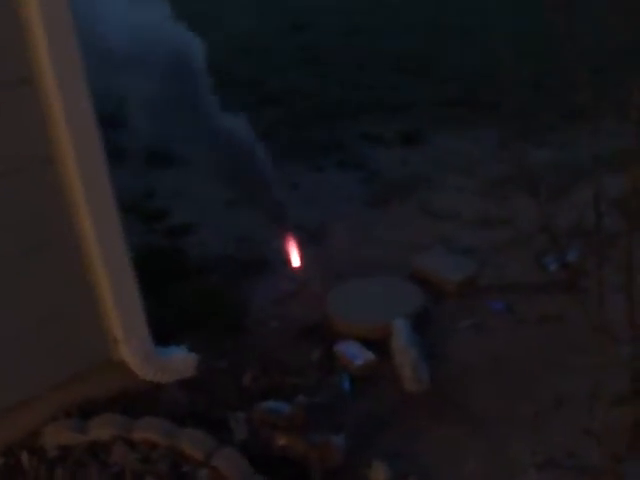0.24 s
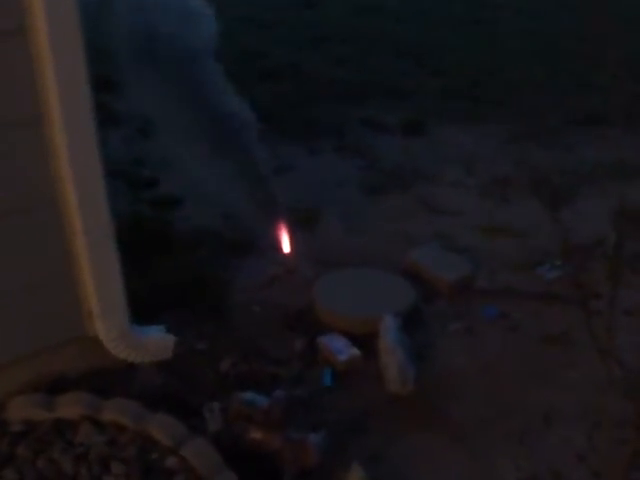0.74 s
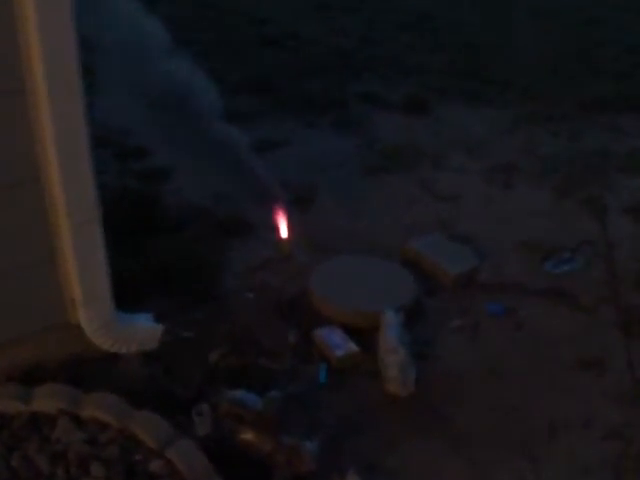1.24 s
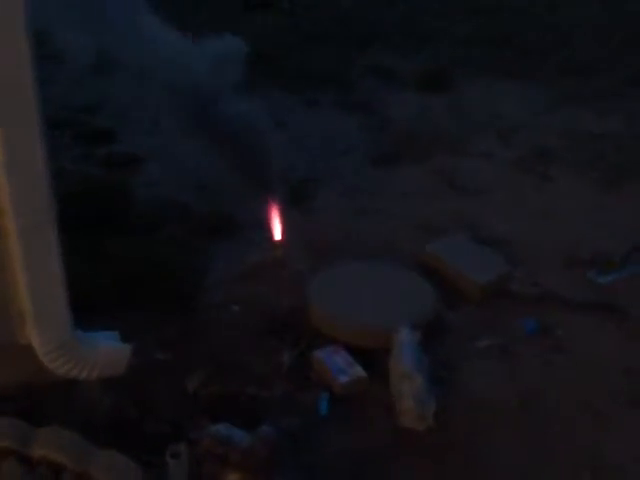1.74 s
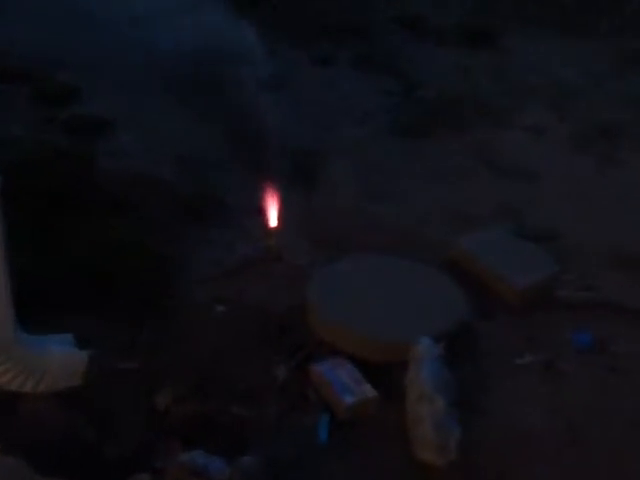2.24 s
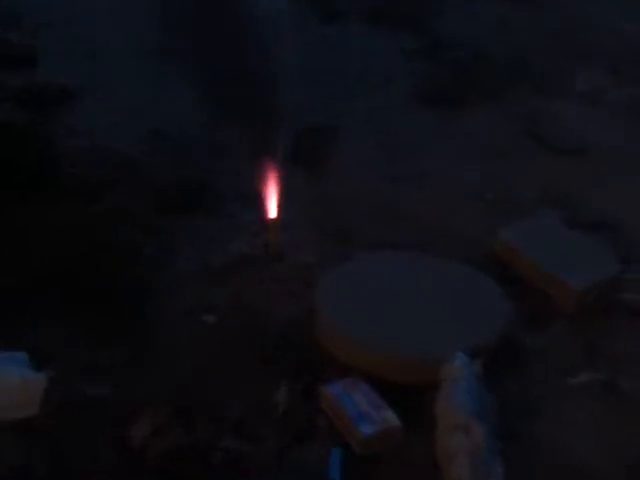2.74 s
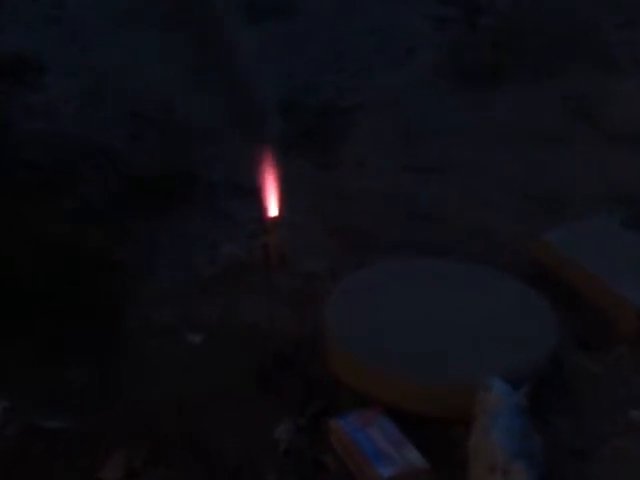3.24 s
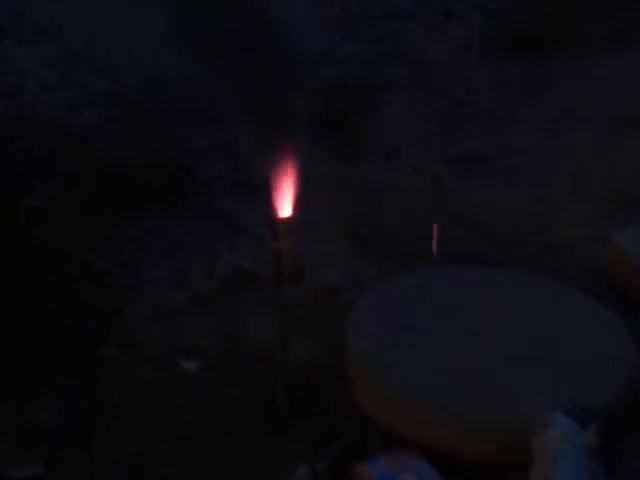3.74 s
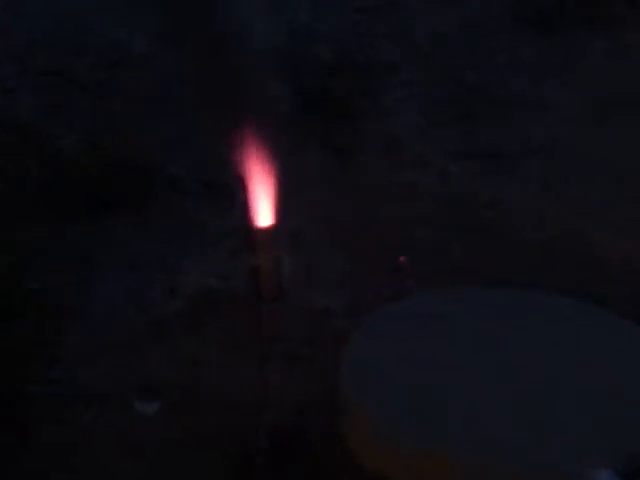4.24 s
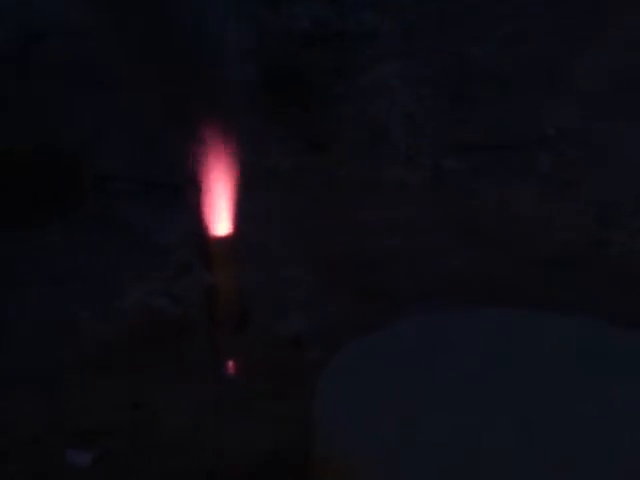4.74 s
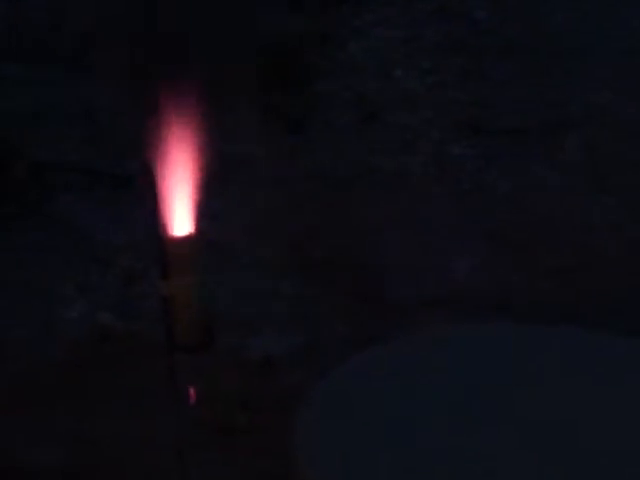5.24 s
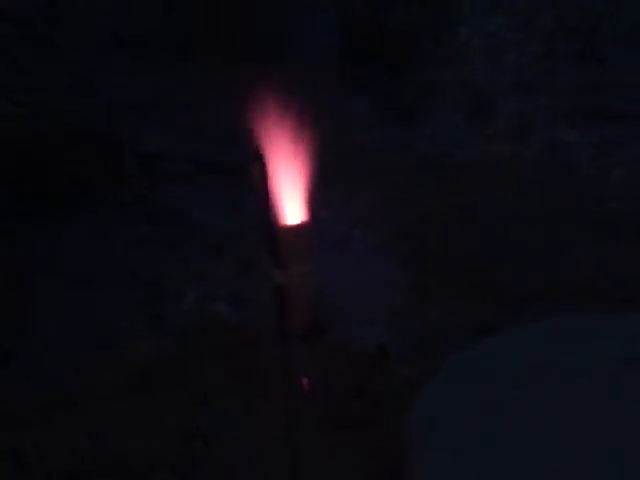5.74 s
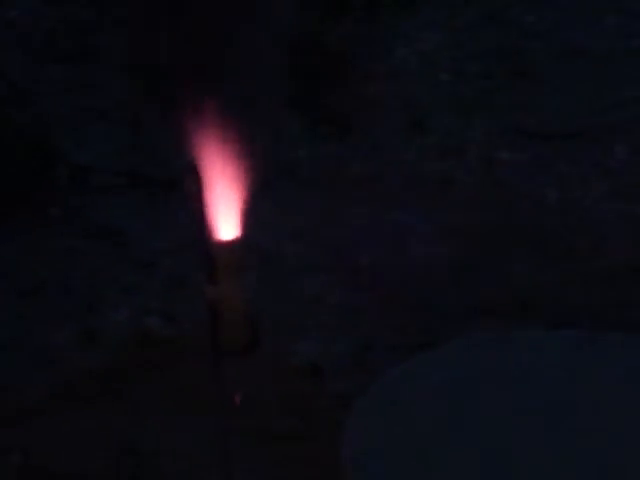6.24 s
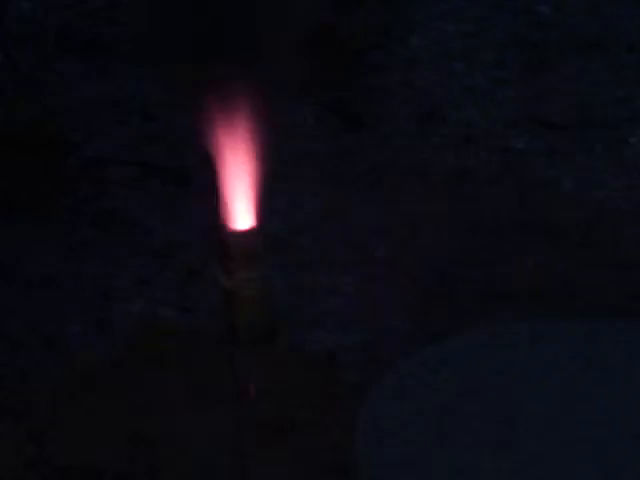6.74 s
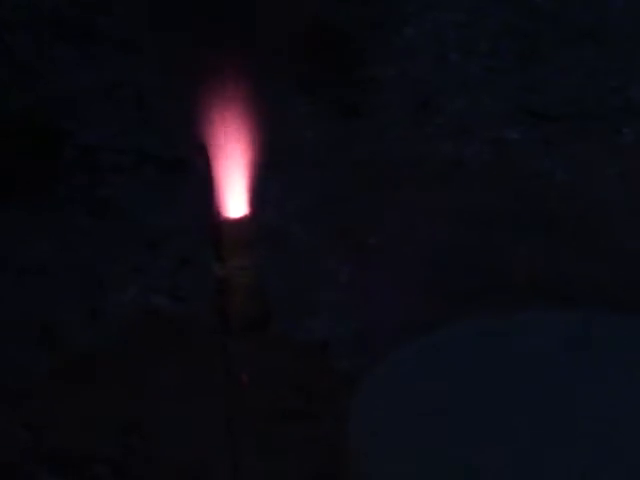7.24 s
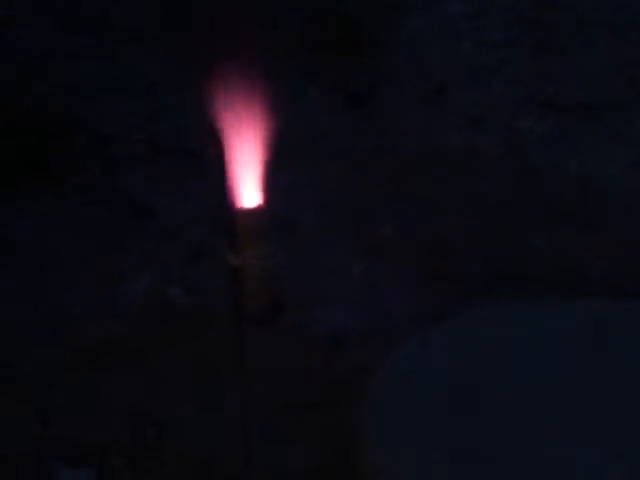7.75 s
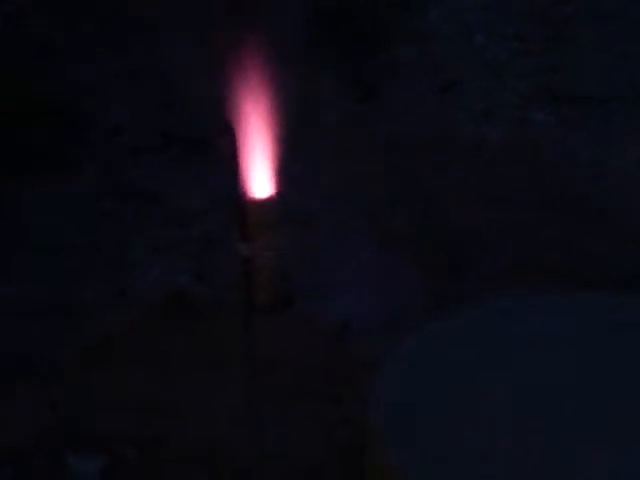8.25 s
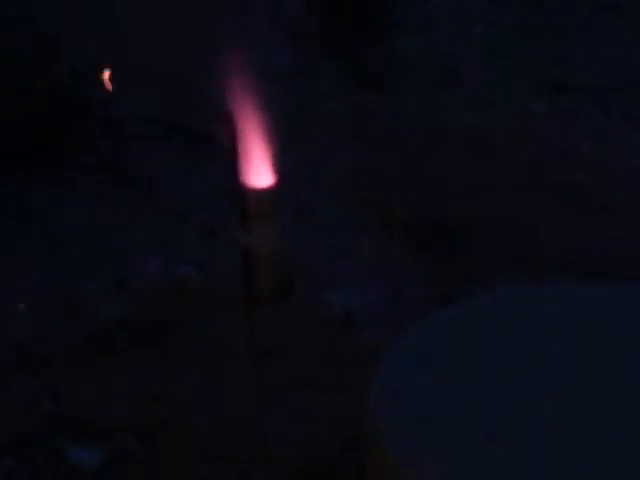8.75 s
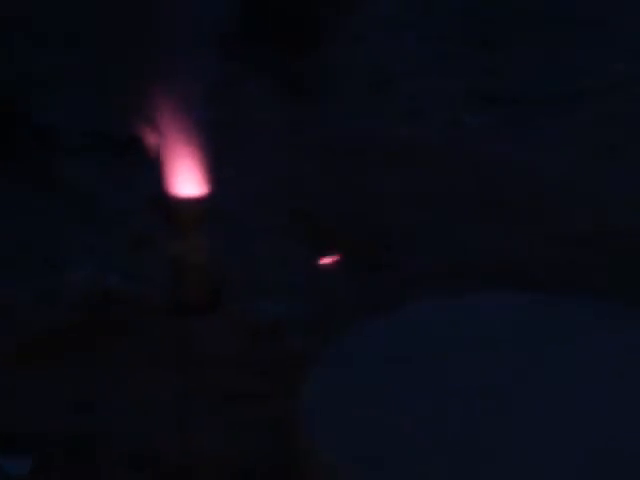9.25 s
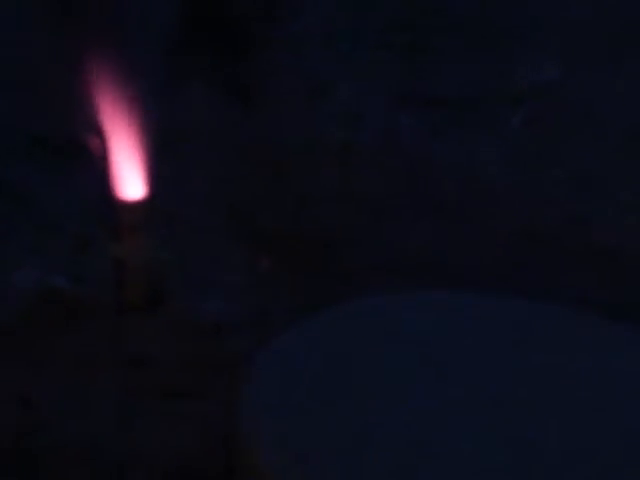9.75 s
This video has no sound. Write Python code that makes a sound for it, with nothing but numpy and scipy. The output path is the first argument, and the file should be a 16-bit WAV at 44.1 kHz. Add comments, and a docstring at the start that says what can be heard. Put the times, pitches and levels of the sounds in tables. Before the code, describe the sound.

Already burning at the start, a jet of exhaust rushes without pause, like gas escaping a narrow pipe. The noisy whistle-like band sinks to about half its pitch as the fuel goes. A soft roar and faint rumble sit underneath; a quick puff interrupts midway, a softer one follows, and a rougher flare comes late. Near, dry outdoor sound, with faint ground and wall echoes and limited extreme treble.

```python
"""A small homemade rocket motor burns upright in a yard, near a hand-held camera.
Its jet hisses, and drives the hollow casing to sing in a broad band that sinks as the fuel burns down.
The plume above roars and rumbles in coloured noise, swelling with a late flare; three brief puffs of
lower-pitched noise are slag sputtering in the mouth. A faint low drone lies beneath.
Echoes from the ground and a house wall, a scattered tail and the microphone port colour the motor."""
import sys
import numpy as np
from scipy import signal
from scipy.fft import rfft, irfft
from scipy.io import wavfile
from scipy.ndimage import map_coordinates

SR = 44100
rng = np.random.default_rng(int(sys.argv[2]) if len(sys.argv) > 2 else 0)


def unload_audio(sound):
    """Save the sound as a 16-bit wav file, at the path given as the first command line argument."""
    columns = np.transpose(np.atleast_2d(sound))
    # keep every value between -1 and 1, then stretch to whole-number steps
    steps = np.round(np.clip(columns, -1, 1) * 32767)
    wavfile.write(sys.argv[1], SR, steps.astype(np.int16))


N = 441000
FRAME = 4096  # samples
HZ, TIMES, _ = signal.stft(np.zeros(N), SR, nperseg=FRAME)
HZ = HZ[:, None] + 1  # keeps clear of 0 Hz

# The fuel burns briefly faster or slower. Each row: centre in seconds, change in dB, 1/e half-length in seconds.
BURN_SURGES = [(1.78, 1.2, .12), (3.68, .7, .2), (4.02, -.9, .06), (4.22, .9, .12), (5.22, 2.2, 0.075),
               (5.34, -1.1, .05), (5.55, .8, .08), (6.35, -1.2, .06), (7.02, 1.3, 0.063), (8.03, -.7, .12)]


def amp(db):
    """Decibels to gain."""
    return 10 ** (np.asarray(db) / 20)


def curves(rows, times):
    """Each column of a table after the first (seconds), interpolated at the given times."""
    s, *cols = np.transpose(rows)
    return [np.interp(times, s, c) for c in cols]


def bumps(rows, t):
    """Level change in dB from (s, dB, length) events, each a smooth Gaussian bump or dip."""
    return sum(db * np.exp(-((t - s) / length) ** 2) for s, db, length in rows)


def shape(points):
    """Gain over frequency of (Hz, dB) points joined on a log axis."""
    f, db = np.transpose(points)
    return amp(np.interp(np.log(HZ), np.log(f), db))


def wobble(knots_per_s):
    """A smooth random curve through normally distributed knots."""
    knots = rng.standard_normal(int(N * knots_per_s / SR) + 4)
    return map_coordinates(knots, [np.arange(N) * knots_per_s / SR])


def resonance(centre_hz, q):
    """Power response of one resonance."""
    return 1 / (1 + (q * (HZ / centre_hz - centre_hz / HZ)) ** 2)


def turbulence(gain):
    """Noise of rms near 1 whose colour follows a gain of frequency and time."""
    z = signal.stft(rng.standard_normal(N), nperseg=FRAME)[2]
    frame_rms = np.sqrt(np.mean(gain ** 2, axis=0))
    return signal.istft(z * gain / frame_rms, nperseg=FRAME)[1][:N]


def exhaust(colour, t):
    """The jet hisses at the mouth and drives the casing, a pipe closed at one end with odd modes only."""
    # Casing's lowest resonance, sinking as the hollow grows. Each row: time in seconds, resonance in Hz.
    bore_rows = [(0, 5650), (.75, 5030), (1.5, 4940), (2.5, 4680), (3.5, 4330), (4.5, 4130), (5.5, 3880),
                 (6.5, 3650), (7.5, 3450), (8.25, 3310), (9, 3090), (9.5, 2860), (10, 2590)]
    # Jet strength before surges, flaring late. Each row: time in seconds, casing in dB, hiss in dB.
    jet_rows = [(0, -26, -25), (.8, -24.7, -25.5), (1.2, -24.5, -28), (4.8, -23.5, -30.5),
                (7, -22.5, -30.5), (8.13, -23.8, -31.5), (8.28, -22.4, -28.5), (9.03, -22.5, -23.9),
                (9.08, -23.5, -27), (10, -25.6, -25.8)]
    # Hiss spectrum. Each row: frequency in Hz, relative density in dB.
    hiss_spectrum = [(1000, -43), (2500, -4.5), (4500, -0.5), (6800, 2), (8300, 2), (9700, 2), (11000, -4)]

    bore_hz, = curves(bore_rows, TIMES)
    q = 14500 / bore_hz  # a deeper hollow loses less at its mouth and rings more sharply
    pipe_power = resonance(bore_hz, q) + .045 * resonance(3 * bore_hz, q)

    casing_db, hiss_db = curves(jet_rows, t)
    casing = amp(casing_db) * turbulence(np.sqrt(pipe_power) * colour)
    hiss = amp(hiss_db) * turbulence(shape(hiss_spectrum) * colour)
    flutter_db = 0.21 * wobble(16) + 0.26 * wobble(70)  # the fuel burns unevenly
    return (casing + hiss) * amp(bumps(BURN_SURGES, t) + flutter_db)


def flame(colour, t):
    """Larger eddies in the plume roar; the largest rumble and swell when the flame billows."""
    # Plume strength before swells. Each row: time in seconds, roar in dB, rumble in dB.
    plume_rows = [(0, -42.3, -59.3), (3, -43, -58), (4.4, -42.3, -56.3), (7.2, -41, -56),
                  (8.1, -42.4, -57.8), (8.6, -36.5, -54.5), (9.05, -34.3, -52), (10, -37.5, -54.5)]
    # Billows. Each row: centre in seconds, extra rumble in dB, 1/e half-length in seconds.
    billow_rows = [(3.45, 3, .2), (6.55, 2, .15), (9.1, 3, .15)]
    # Turbulence spectra. Each row: frequency in Hz, relative density in dB.
    roar_spectrum = [(200, -43), (420, -20.5), (570, -13.5), (720, -8), (790, -2), (950, 0), (1150, -2),
                     (1250, -6), (1900, -2.5), (2600, -7.5), (5000, -16.5), (11000, -50)]
    rumble_spectrum = [(20, -55), (50, -40), (75, -24), (110, -14.5), (180, -2), (310, 0), (430, -5.5),
                       (600, -10.5), (1200, -37)]
    roar_per_surge, roar_per_billow = .6, .35  # dB per dB
    eddy_db, eddy_knots_per_s = .6, 5.7

    roar_db, rumble_db = curves(plume_rows, t)
    billow_db = bumps(billow_rows, t)
    roar_db = roar_db + roar_per_surge * bumps(BURN_SURGES, t) + roar_per_billow * billow_db
    rumble_db = rumble_db + billow_db + eddy_db * wobble(eddy_knots_per_s)
    roar = amp(roar_db) * turbulence(shape(roar_spectrum) * colour)
    rumble = amp(rumble_db) * turbulence(shape(rumble_spectrum) * colour)
    return roar + rumble


def background():
    """The faint, steady low drone of the outdoors."""
    drone_spectrum = [(10, -12), (40, -12), (68, -9), (90, 0), (300, -16), (2000, -60)]  # Hz, relative dB
    return amp(-78.5) * turbulence(shape(drone_spectrum))


def sputters(colour, t):
    """Slag chokes the mouth for a moment; each lump gives a short, lower puff as it blows out."""
    # Each row: centre in seconds, peak level in dB, pitch in Hz, 1/e half-length in seconds.
    slag_puffs = [(5.225, -41, 980, .015), (5.244, -34, 1550, .012), (6.505, -42, 980, .03)]
    puffs = 0
    for s, db, hz, length in slag_puffs:
        swell = np.exp(-((t - s) / length) ** 2)
        puffs = puffs + amp(db) * swell * turbulence(resonance(hz, q=2.2) * colour)
    return puffs


def yard(hz, wet_db, t60_s, dull_hz):
    """Response of the short, dull tail that stones, shrubs and siding scatter."""
    t = np.arange(SR // 2) / SR
    tail = rng.standard_normal(len(t)) * amp(-60 * t / t60_s) * (t > .008)
    spectrum = rfft(tail / np.linalg.norm(tail))
    ripple = np.interp(hz, np.fft.rfftfreq(len(t), 1 / SR), spectrum)
    return amp(wet_db) * ripple / np.hypot(1, (hz / dull_hz) ** 2)


def path(scatter_hz=6000):
    """Colour of the way from motor to microphone: echoes comb the sound, the port shapes it."""
    # Camera swings to face the motor. Each row: time in seconds, echo path ratio, share of port colour.
    aim_rows = [(0, 0.89, 0.41), (.7, 0.92, .6), (1.4, 0.97, 1), (10, 0.99, 0.92)]
    # Reflections from ground, paving and wall. Each row: delay in seconds at path ratio 1, gain before scatter.
    reflections = [(.00116, .09), (.00294, .08), (.00612, .05), (.00637, .05), (.00746, .04),
                   (.00794, .045), (.0124, .04)]
    # Peaks and notches from camera body, microphone port and things close by.
    # Each row: centre in Hz, full width at half the dB in Hz, gain in dB at full share.
    port_rows = [(643, 59, 4.1), (732, 20, -1.7), (1246, 182, -3.8), (1572, 188, -3.9), (2049, 36, -3.9),
                 (2270, 52, -3.4), (2524, 243, 3.4), (2888, 52, -4.6), (3029, 305, 2.3), (3492, 271, 4.0),
                 (3643, 77, 2.1), (3706, 35, -4.9), (3832, 111, -6.9), (3993, 14, -2.5), (4118, 157, 3.9),
                 (4373, 22, 1.9), (4488, 33, -3.1), (4565, 570, -1.7), (5188, 270, 2.5), (5990, 198, -2.4),
                 (6827, 207, 1.9), (7336, 162, -3.0), (8465, 246, -2.8), (9225, 281, 2.0), (9841, 245, 2.2)]

    stretch, share = curves(aim_rows, TIMES)
    comb_hz = HZ * stretch  # the comb slides down while the echo paths lengthen
    echoes = sum(gain * np.exp(-2j * np.pi * comb_hz * delay) for delay, gain in reflections)
    mirror = 1 / np.hypot(1, HZ / scatter_hz)  # rough surfaces scatter the treble
    diffuse = yard(comb_hz, wet_db=-11.5, t60_s=.16, dull_hz=7000)
    port_db = sum(db * .5 ** ((2 * (HZ - hz) / width) ** 2) for hz, width, db in port_rows)
    return np.abs(1 + mirror * echoes + diffuse) * amp(share * port_db)


def scene():
    """The motor as heard from the camera, over the drone of the outdoors."""
    colour, t = path(), np.arange(N) / SR
    motor = exhaust(colour, t) + flame(colour, t) + sputters(colour, t)
    return (motor + background())[None]


def record(dry):
    """The camera keeps nothing above its band limit."""
    top_hz = 11040
    passed = np.fft.rfftfreq(N, 1 / SR) < top_hz
    return irfft(rfft(dry) * passed, N)


dry = scene()
out = record(dry)
unload_audio(out)
```